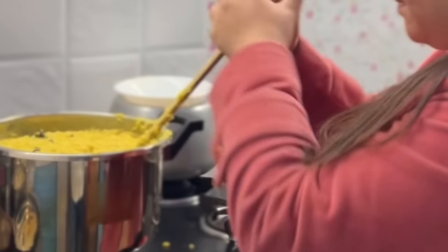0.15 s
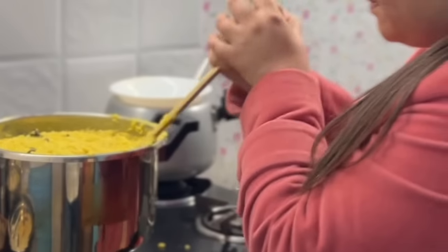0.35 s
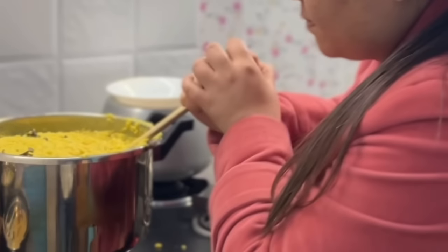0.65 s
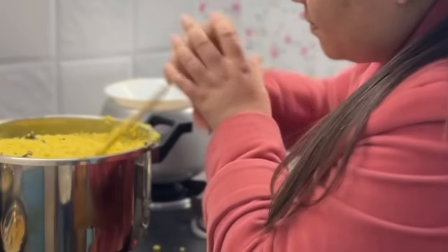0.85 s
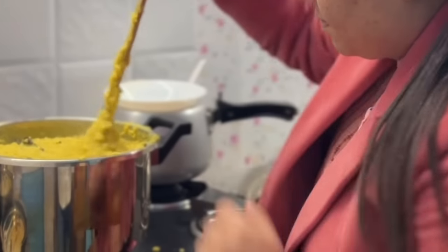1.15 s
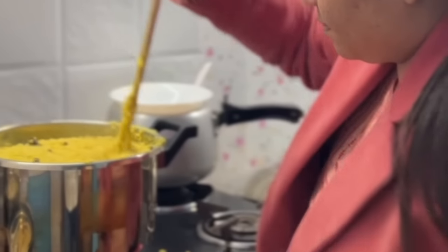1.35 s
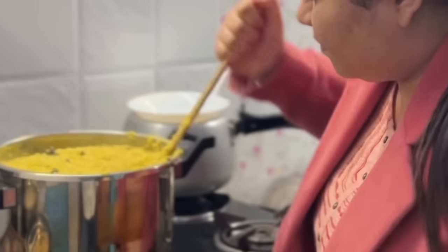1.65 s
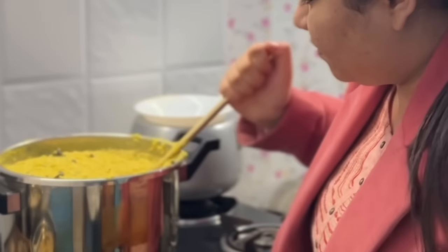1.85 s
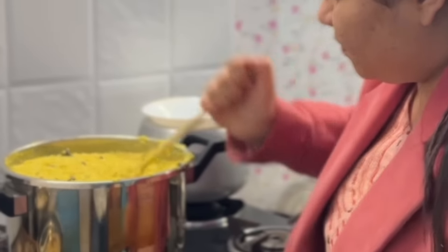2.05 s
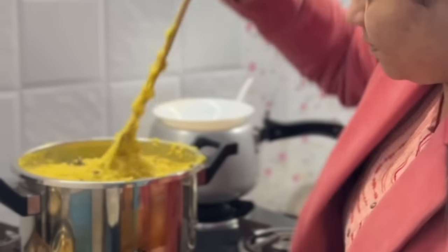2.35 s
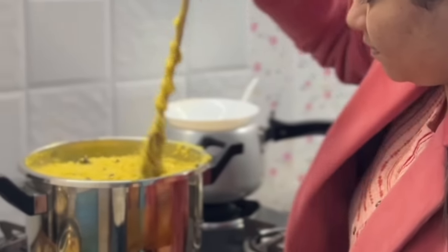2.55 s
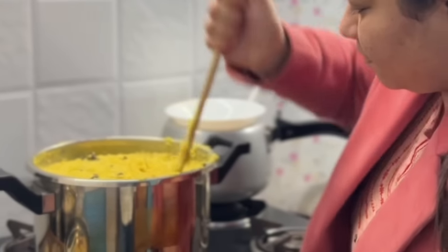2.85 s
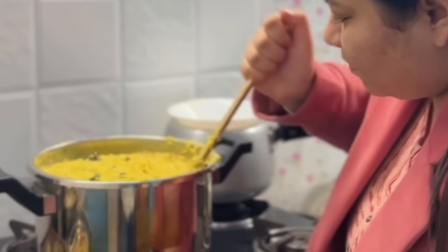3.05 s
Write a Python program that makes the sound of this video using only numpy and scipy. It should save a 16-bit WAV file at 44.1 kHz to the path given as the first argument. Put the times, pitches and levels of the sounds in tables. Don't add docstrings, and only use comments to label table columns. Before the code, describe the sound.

A wooden spatula stirs thick food in a steel pot, close up: a knock and long scrape, a lone tap, a clattering second scrape, then more knocks and a brief rub, in a small tiled kitchen.

```python
import sys
import numpy as np
from scipy import signal
from scipy.fft import rfft, irfft, next_fast_len
from scipy.io import wavfile
from scipy.ndimage import uniform_filter1d

SR = 44100
rng = np.random.default_rng(int(sys.argv[2]) if len(sys.argv) > 2 else 0)


def volts_from_db(level):
    exponent = np.asarray(level, float) / 20
    return 10 ** exponent


def file_out(sig):
    cols = np.atleast_2d(sig).T
    lim = np.clip(cols, -1, 1)
    pcm = np.round(lim * 32767).astype(np.int16)
    wavfile.write(sys.argv[1], SR, pcm)


N = 141120

# t/s, blow level/dB, rim tick level/dB, handle f/Hz, ring level/dB
KNOCKS = [(0.285, -27, -23, 2840, -16), (0.902, -26, -16, 935, -14), (1.554, -27.5, -33, 2570, -9),
          (1.647, -19, -7, 1570, -22), (1.691, -20, -28, 1390, -8), (1.711, -23, -27, 1410, -4.5),
          (1.828, -22, -15, 1880, -10), (2.134, -27, -42, 1017, -1), (2.59, -26.5, 2.5, 955, -3.5),
          (2.9, -20, -12.5, 915, -7.5), (2.916, -15.5, -3.5, 2450, -34)]
# f/Hz, level/dB
BLOW_SPECTRUM = [(200, -22.5), (600, 1.5), (1200, -2), (3000, -3.5), (4200, -13), (6000, -45)]
# f/Hz, level/dB
TICK_SPECTRUM = [(2500, -2), (4500, 7), (8000, 3.5), (12000, -11), (14000, -11)]
# f/Hz, level/dB, t60/s
RIM_MODES = [(970, -29, 0.022), (1450, -15, 0.012), (1860, -26, 0.035), (2450, -5, 0.028),
             (2900, -8, 0.027), (3600, -21, 0.0092)]
# t/s, skid length/s, f/Hz, level/dB
PINGS = [(0.286, 0.0049, 3780, -40.5), (0.287, 0.0064, 2840, -55), (0.309, 0.0091, 2750, -42.5),
         (0.311, 0.0082, 1006, -35), (0.373, .008, 910, -41), (0.403, 0.0092, 925, -43),
         (0.455, .012, 881, -32.5), (0.462, 0.028, 3600, -48), (0.649, 0.013, 925, -41.5),
         (0.9015, 0.0053, 933, -34), (0.9017, 0.0065, 1670, -33), (0.9028, 0.0051, 2450, -35),
         (0.9018, 0.0051, 2910, -36), (1.5545, 0.008, 2400, -44.5), (1.5545, 0.0091, 2760, -46),
         (1.5545, 0.0086, 1820, -51), (1.5525, 0.01, 956, -45), (1.5552, 0.007, 3340, -60),
         (1.6472, 0.0025, 1450, -20), (1.652, 0.0076, 2380, -32.5), (1.69, 0.0044, 1460, -27),
         (1.711, .004, 1450, -28), (1.719, 0.0044, 1450, -33), (1.774, 0.0098, 572, -38),
         (1.801, 0.0041, 2784, -34.5), (1.829, 0.0027, 1954, -27), (1.829, .004, 3810, -35),
         (2.133, 0.016, 907, -47), (2.132, 0.0053, 1650, -39), (2.135, 0.0098, 2600, -47),
         (2.137, 0.0057, 3600, -52), (2.187, 0.0039, 1030, -42), (2.186, 0.011, 2660, -52),
         (2.59, 0.0041, 2990, -35), (2.59, .003, 4410, -42), (2.591, 0.0035, 660, -36),
         (2.6, .006, 2640, -47), (2.898, .013, 936, -27), (2.899, 0.0096, 2388, -27),
         (2.918, 0.002, 2623, -13), (2.916, 0.0056, 3504, -26), (2.917, 0.0027, 7310, -30),
         (2.932, .008, 3930, -36), (3.095, 0.0051, 970, -41.5), (3.148, .008, 574, -60),
         (3.166, 0.011, 592, -69), (3.177, .01, 3600, -43)]
# t/s, level/dB, centre f/Hz, decay/s
THUDS = [(0.30, -37.5, 344, 0.026), (0.464, -32, 123, 0.014), (0.906, -28.5, 343, 0.026),
         (1.059, -46.5, 206, 0.026), (1.251, -59.5, 480, 0.013), (1.556, -25.5, 147, 0.019),
         (1.806, -22.5, 233, 0.016), (2.137, -29.5, 344, 0.023), (2.592, -32.5, 545, 0.016),
         (2.903, -24, 256, 0.021), (2.905, -24, 97, 0.012), (2.913, -26, 283, 0.0056),
         (0.575, -33.5, 303, 0.013), (1.735, -25, 350, 0.0095), (1.794, -34, 290, 0.012),
         (1.09, -45.5, 106, 0.034), (2.279, -49.5, 100, 0.059), (2.159, -35.5, 320, 0.022),
         (2.6, -44, 278, 0.026), (0.93, -57, 2160, 0.094), (2.925, -30, 550, 0.023)]
# t/s, pressure level/dB, depth in food level/dB, dryness level/dB
STROKES = [
    [(0.28, -77, -3, -21), (0.284, -53.5, -1, 4), (0.318, -39, -8, -11), (0.362, -44.5, -15, -15),
     (0.452, -33, -7, -14.5), (0.604, -52.5, 13, -15.5), (0.646, -50, 3, -15), (0.738, -79, 22.5, -22),
     (0.86, -77, 3, -14)],
    [(1.65, -37, 2.5, -13), (1.678, -59, 6, 11.5), (1.696, -35.5, 1, -11), (1.772, -38, 0, -12.5),
     (1.828, -39.5, 9, -3.5), (1.908, -59, 13, -20), (1.948, -45.5, 6.5, -17), (2.078, -82, 22.5, -29),
     (2.12, -63, 11, -22)],
    [(2.99, -47, 2, -5), (3.014, -52, -1, -11), (3.086, -51, 7, -18), (3.096, -46.5, -22, -7),
     (3.114, -51, 2, -12), (3.2, -35, -2.5, -11)],
]
# f/Hz, width/Hz, level/dB
POT_MODES = [(577, 49, 6), (930, 62, 1.5), (1810, 50, -1), (2450, 110, -10.5), (2800, 280, -12),
             (3500, 47, -8), (5730, 170, -6), (7280, 90, 0), (8500, 110, -9)]
# f/Hz, level/dB per Hz
DRAG_SPECTRUM = [(300, -9), (450, -5.5), (900, -4.5), (1300, -3.5), (1900, -4), (3000, -14), (3900, -19),
                 (4800, -57)]
# f/Hz, level/dB per Hz
GRIT_SPECTRUM = [(2350, -18), (4000, -8.5), (6610, -10), (7340, -8.5), (11800, -40), (13000, -77)]
# f/Hz, level/dB per Hz
SLOSH_SPECTRUM = [(24, -65), (40, -59), (81, 2.5), (226, -11), (262, 1), (301, -1), (364, 3), (418, -36),
                  (500, -24), (650, -72), (1100, -120)]
# t/s, length/s, f/Hz, level/dB
RUBS = [(.42, .13, 1747, -46.5), (0.616, 0.066, 943, -52), (1.561, 0.043, 3335, -57),
        (1.693, 0.032, 1450, -34), (1.789, 0.019, 2550, -43.5), (1.85, 0.024, 3600, -46.5),
        (1.911, 0.04, 950, -50.5), (2.892, 0.012, 2450, -49), (2.598, 0.062, 623, -44),
        (.29, 0.04, 3720, -53), (0.396, 0.13, 3600, -51), (.77, 0.24, 2290, -74)]
# f/Hz, t60/s
KITCHEN_DECAY = [(100, 0.62), (400, 0.3), (1500, 0.36), (5000, 0.33), (11000, 0.3)]
# f/Hz, side to mid level/dB
WIDTH_SPECTRUM = [(60, -44), (150, -20.5), (300, -16.5), (600, -4), (1200, -5.5), (3000, -11.5),
                  (8000, -16), (14000, 16.5)]
# f/Hz, level/dB per Hz
HUM_SPECTRUM = [(12, -20), (20, -15.5), (75, -2), (277, -20.5), (476, -30.5), (3950, -41), (5320, -36),
                (11400, -44.5), (13000, -47)]
# f/Hz, width/Hz, level/dB
BURNER_JETS = [(1820, 530, -75), (5335, 230, -74)]
# t/s, level/dB, half length/s
HUSHES = [
    (0.027, -2, 0.05),
    (0.75, -16, 0.091),
    (1.488, -6.5, 0.15),
    (2.06, -10, 0.071),
    (2.532, -8, 0.17),
    (2.81, -2.5, 0.032),
]
# f/Hz, level/dB
SIDE_BAND = [(1700, 0), (1950, -22), (2200, 4.5), (5700, 13), (5900, -36), (7400, -18), (8900, 9),
             (15700, -17.5), (16000, -62)]


def evened(x):
    return x / np.sqrt(np.mean(x ** 2) + 1e-20)


def read(points, hz):
    f, value = np.transpose(points)
    return np.interp(np.log(hz + 1), np.log(f + 1), value)


def colour(x, points):
    size = next_fast_len(len(x) + 4096)
    gain = volts_from_db(read(points, np.fft.rfftfreq(size, 1 / SR)))
    return irfft(rfft(x, size) * gain, size)[:len(x)]


def resonate(x, hz, width):
    r = np.exp(-np.pi * width / SR)
    return 2 * signal.lfilter([1 - r], [1, -r * np.exp(2j * np.pi * hz / SR)], x).real


def add(mix, s, sound):
    part = mix[round(s * SR):][:len(sound)]
    part += sound[:len(part)]


def ring(modes, t, detune):
    total = 0
    for (hz, db, t60), d in zip(modes, detune):
        total = total + volts_from_db(db - 60 * t / t60) * np.sin(2 * np.pi * hz * (1 + 0.031 * d) * t)
    return total


def knock(start, blow_db, tick_db, handle_hz, ring_db):
    crack_s, rattle_s, rattle_db = 0.00071, 0.006, -10.5
    rim_db, handle_db, handle_t60 = -11, -2, 0.019
    t = np.arange(SR // 3) / SR
    chance = rng.standard_normal(6)
    noise = rng.standard_normal((2, len(t)))
    contact = noise * (np.exp(-t / crack_s) + volts_from_db(rattle_db) * np.exp(-t / rattle_s))
    handle = ring([(handle_hz, handle_db, handle_t60)], t, [0])
    body = volts_from_db(rim_db) * ring(RIM_MODES, t, chance) + handle
    rung = signal.fftconvolve(contact[0][:300], body)[:len(t)]
    blow = evened(colour(contact[0], BLOW_SPECTRUM)) + evened(rung) * volts_from_db(ring_db)
    tick = evened(colour(contact[1], TICK_SPECTRUM))
    rise_s = 0.00064 + 0.000061 * np.maximum(-tick_db, 0)
    return start, volts_from_db(blow_db - 25) * np.minimum(t / rise_s, 1) * (blow + volts_from_db(tick_db) * tick)


def ping(start, skid_s, hz, db):
    rise_s, fade_s, rough_s = 0.0018, 0.0016, 0.0017
    t = np.arange(SR // 10) / SR
    neighbour = 0.42 * np.sin(2 * np.pi * hz * (1 + 0.0693) * t)
    tone = np.sin(2 * np.pi * hz * t) + neighbour
    rough = signal.lfilter([1], [1, -np.exp(-1 / (rough_s * SR))], rng.standard_normal(len(t)))
    tone = tone * (1 + 0.42 * evened(rough))
    held = np.exp(-np.maximum(t - skid_s, 0) / fade_s)
    return start, volts_from_db(db) * tone * (1 - np.exp(-t / rise_s)) * held


def thud(start, db, hz, decay_s):
    t = np.arange(SR // 2) / SR
    low = resonate(rng.standard_normal(len(t)), hz, hz)
    low = evened(resonate(low, hz, hz))
    low = signal.sosfilt(signal.butter(2, 55, "high", fs=SR, output="sos"), low)
    return start, volts_from_db(db) * low * (1 - np.exp(-t / 0.0059)) * np.exp(-t / decay_s)


def drag():
    slips_per_s, spread_db, ring_db = 3000, 3.5, 5
    t, out = np.arange(N) / SR, np.zeros(N)
    size = volts_from_db(spread_db * np.minimum(rng.exponential(1, N), 4))
    happens = rng.random(N) < slips_per_s / SR
    slips = size * happens * rng.choice([-1., 1.], N)
    judder = volts_from_db(1.19 * evened(uniform_filter1d(rng.standard_normal(N), 500)))
    slips = evened((evened(slips) + 0.57 * rng.standard_normal(N)) * judder)

    rung = np.zeros(N)
    for hz, width, db in POT_MODES:
        width = max(width, 15)
        rung += volts_from_db(db) * resonate(slips, hz, width) * np.sqrt(60 / width)
    low_ring = evened(colour(rung, [(3800, 0), (4500, -40)]))
    high_ring = evened(colour(rung, [(3800, -40), (4500, 0)]))
    wall = evened(evened(colour(slips, DRAG_SPECTRUM)) + volts_from_db(ring_db) * low_ring)
    scratch = slips + 0.96 * rng.standard_normal(N)
    grit = evened(evened(colour(scratch, GRIT_SPECTRUM)) + volts_from_db(-8) * high_ring)
    slosh = evened(colour(rng.standard_normal(N) * judder, SLOSH_SPECTRUM))

    for rows in STROKES:
        s, press_db, depth_db, dry_db = np.transpose(rows)
        fade_in = np.clip((t - s[0]) / 0.0027, 0, 1)
        fade_out = np.clip((s[-1] + 0.024 - t) / 0.041, 0, 1)
        pressure = volts_from_db(np.interp(t, s, press_db))
        food = volts_from_db(np.interp(t, s, depth_db)) * slosh
        dry_wood = volts_from_db(np.interp(t, s, dry_db)) * grit
        out += fade_in * fade_out * pressure * (wall + food + dry_wood)
    return out


def rub(start, length, hz, db):
    t = np.arange(SR // 4) / SR
    tone = evened(resonate(rng.standard_normal(len(t)), hz, 60))
    rise = np.minimum(t / (0.053 * length), 1)
    fade = np.clip((1.49 * length - t) / length, 0, 1)
    return start, volts_from_db(db) * tone * rise * fade


def kitchen(x):
    taps = np.zeros((2, SR))
    at = np.arange(200, SR - 20, 20) + rng.integers(0, 20, (2, (SR - 201) // 20))
    np.put_along_axis(taps, at, rng.choice([-1., 1.], at.shape), 1)
    hz, t, z = signal.stft(taps, SR, nperseg=256)
    decay = volts_from_db(-60 * t / read(KITCHEN_DECAY, hz)[:, None])
    tail = signal.istft(z * decay, SR, nperseg=256)[1]
    wet = signal.fftconvolve(x[None], tail / np.linalg.norm(tail[0]), axes=1)[:, :N]
    return np.array([wet[0], colour(wet[1], WIDTH_SPECTRUM)])


def hum():
    hum_db, wide_db = -52, 2
    noise, t = rng.standard_normal((4, N)), np.arange(N) / SR
    slow = uniform_filter1d(uniform_filter1d(rng.standard_normal(N), 3000), 3000)
    swell = volts_from_db(0.78 * evened(slow))
    hush = volts_from_db(sum(db * np.exp(-((t - s) / half_s) ** 2) for s, db, half_s in HUSHES))
    split = signal.butter(1, 2500, fs=SR, output="sos")
    pair = []
    for k in (0, 1):
        jets = np.zeros(N)
        for hz, width, db in BURNER_JETS:
            jet = resonate(resonate(noise[2 + k], hz, width), hz, width)
            jets += volts_from_db(db) * evened(jet)
        floor = volts_from_db(hum_db) * evened(colour(noise[k], HUM_SPECTRUM))
        low = signal.sosfiltfilt(split, floor)
        pair.append(swell * low + hush * (floor - low) + jets)
    return np.array([pair[0], volts_from_db(wide_db) * colour(pair[1], WIDTH_SPECTRUM)])


def scene():
    wet_knock_db, wet_drag_db, wet_ping_db, near_wide_db = 1.5, -1, -5, -20
    right_lean, left_lag = 0.0035, 0.12
    knocks, rubs, pings = np.zeros(N), np.zeros(N), np.zeros(N)
    for row in KNOCKS:
        add(knocks, *knock(*row))
    for row in PINGS:
        add(pings, *ping(*row))
    for row in THUDS:
        add(knocks, *thud(*row))
    for row in RUBS:
        add(rubs, *rub(*row))
    drags = drag() + rubs
    near = knocks + drags + pings
    sent = volts_from_db(wet_knock_db) * knocks + volts_from_db(wet_drag_db) * drags + volts_from_db(wet_ping_db) * pings
    far = kitchen(sent) + hum()
    mid = far[0] + near
    lean = signal.lfilter([right_lean + left_lag, -left_lag], [1], mid)
    side = far[1] - volts_from_db(near_wide_db) * colour(near, WIDTH_SPECTRUM) - lean
    return np.array([mid + side, mid - side])


def low_pass(x):
    return signal.sosfilt(signal.butter(12, 16100, fs=SR, output="sos"), x)


def record(dry):
    duck_from_db, duck_share, duck_s = -42.5, 0.2, 0.14
    r = np.exp(-1 / (duck_s * SR))
    power_db = 10 * np.log10(uniform_filter1d((dry ** 2).mean(0), 2000).clip(1e-12))
    excess_db = np.maximum(power_db - duck_from_db, 0)
    duck_db = duck_share * signal.lfilter([1 - r], [1, -r], excess_db)
    left, right = dry / volts_from_db(duck_db)
    mid = colour((left + right) / 2, [(11740, 0), (12300, -26), (13800, -18), (14300, -70)])
    side = colour((left - right) / 2, SIDE_BAND)
    return low_pass(np.array([mid + side, mid - side]))


dry = scene()
out = record(dry)
file_out(out)
```